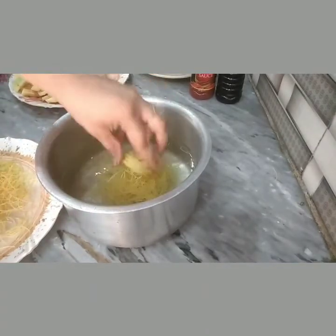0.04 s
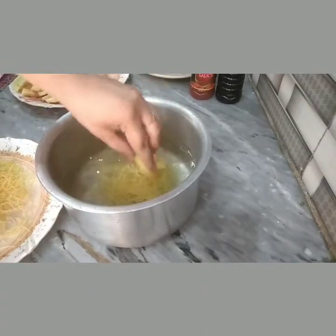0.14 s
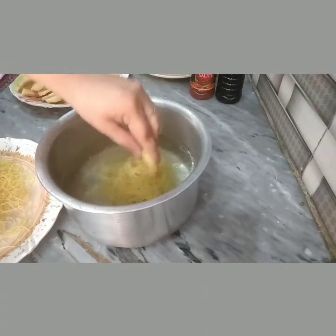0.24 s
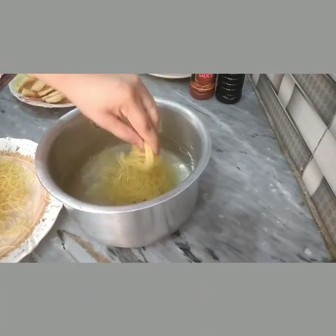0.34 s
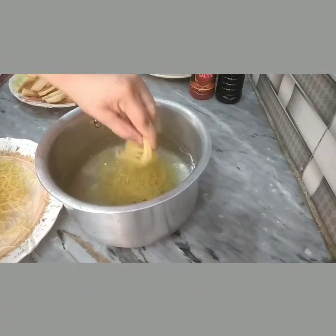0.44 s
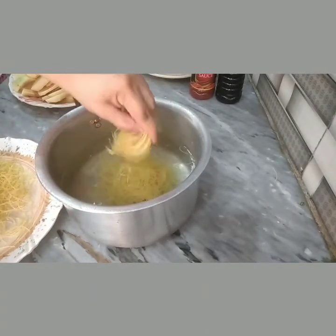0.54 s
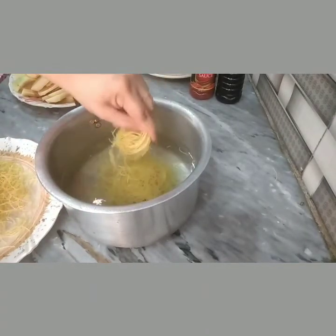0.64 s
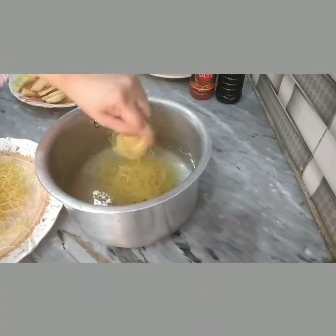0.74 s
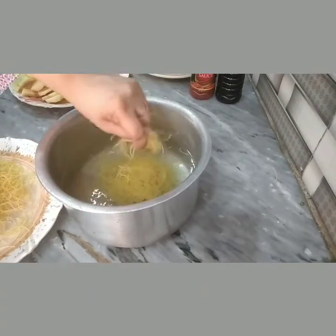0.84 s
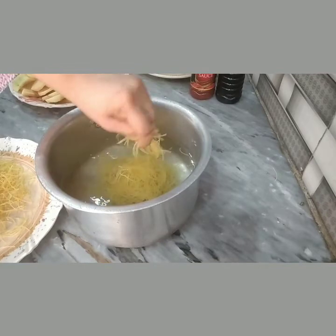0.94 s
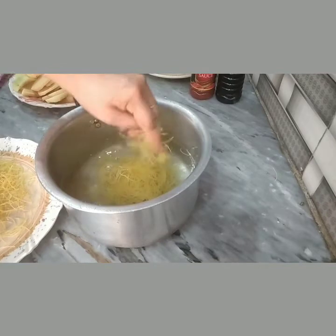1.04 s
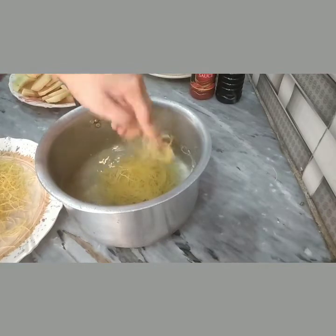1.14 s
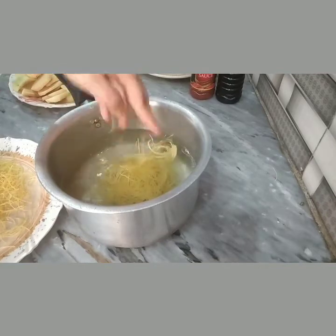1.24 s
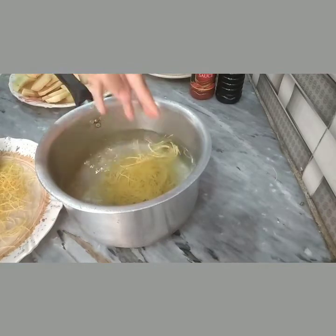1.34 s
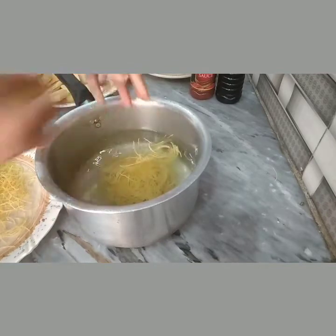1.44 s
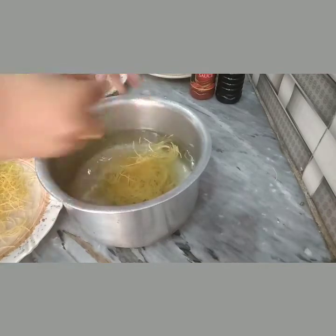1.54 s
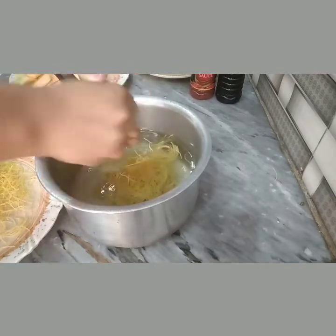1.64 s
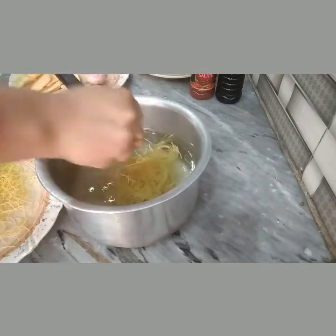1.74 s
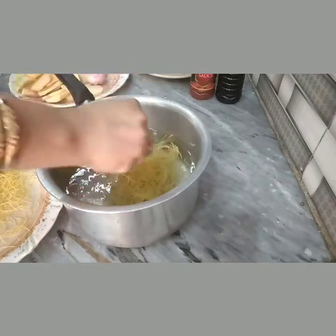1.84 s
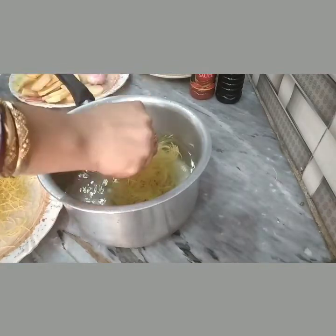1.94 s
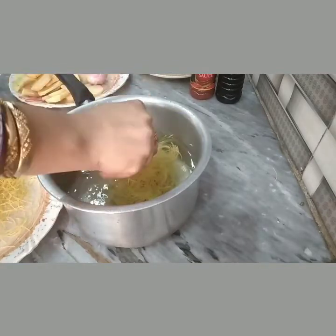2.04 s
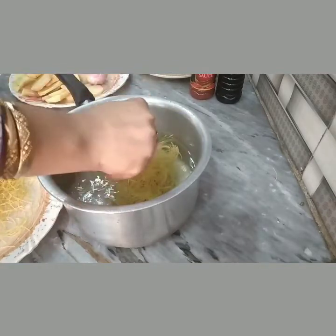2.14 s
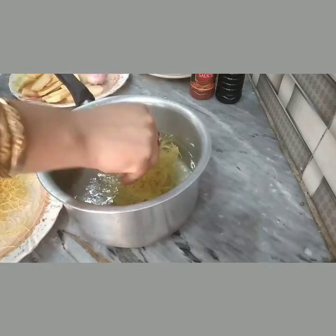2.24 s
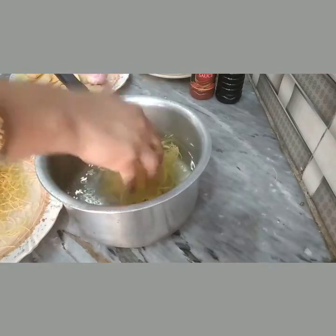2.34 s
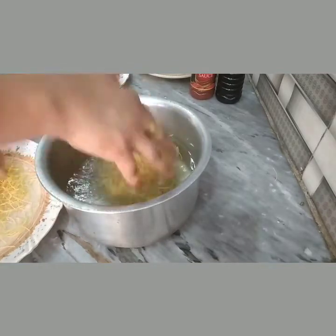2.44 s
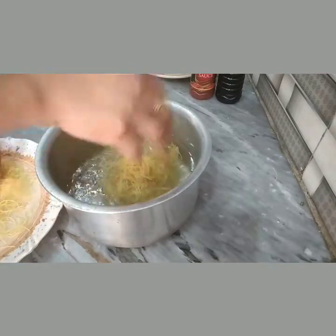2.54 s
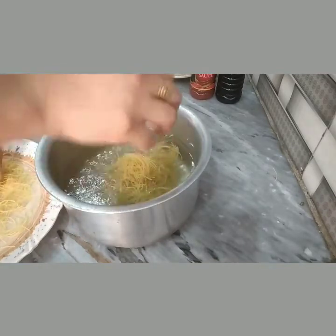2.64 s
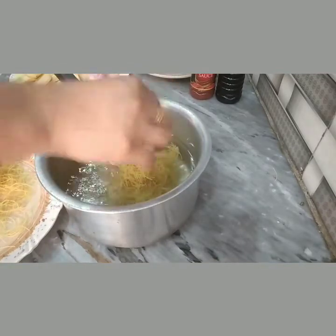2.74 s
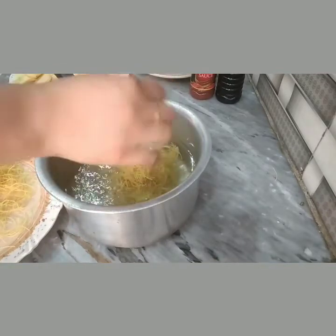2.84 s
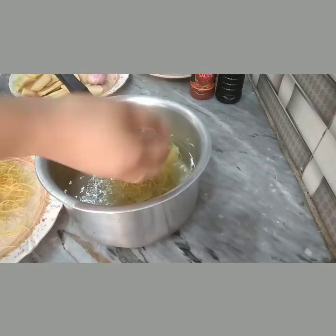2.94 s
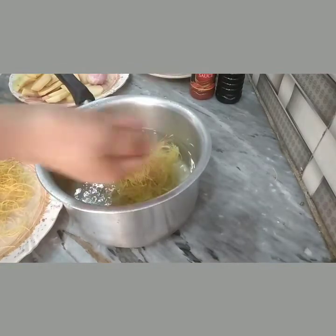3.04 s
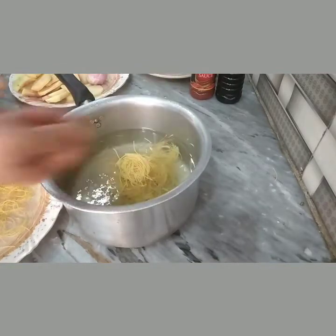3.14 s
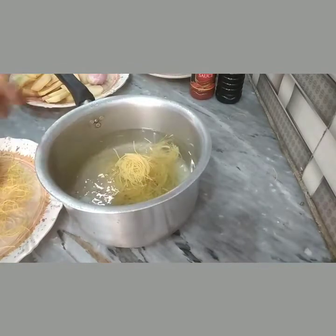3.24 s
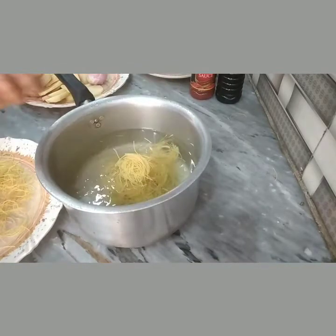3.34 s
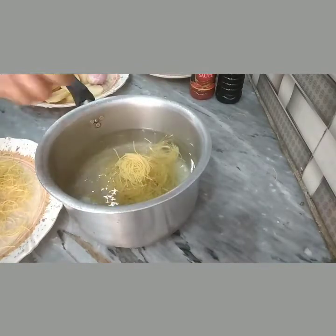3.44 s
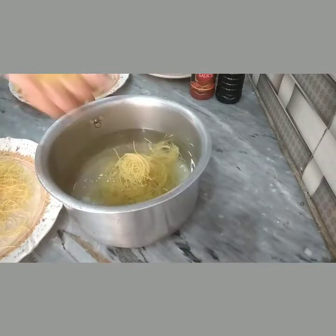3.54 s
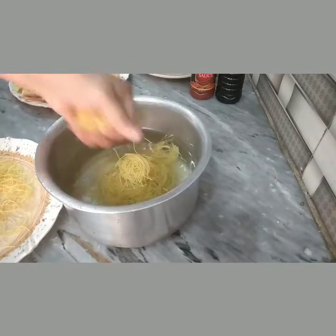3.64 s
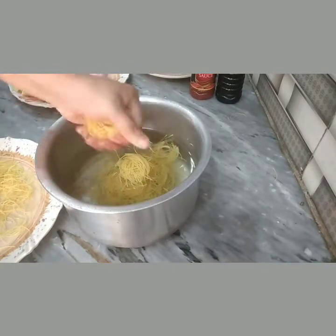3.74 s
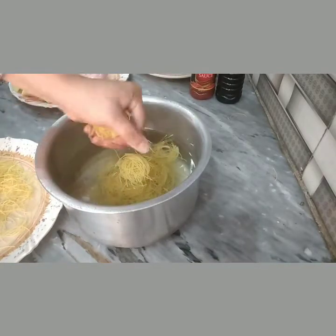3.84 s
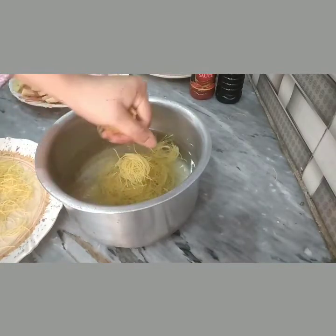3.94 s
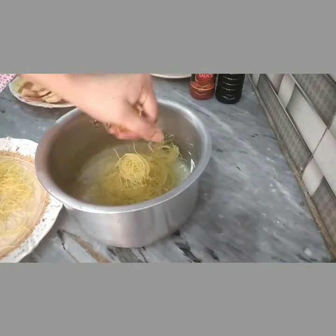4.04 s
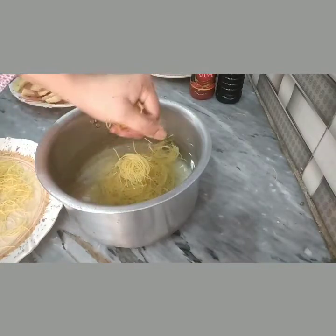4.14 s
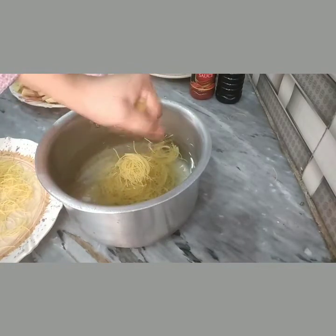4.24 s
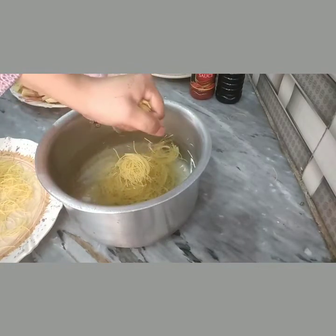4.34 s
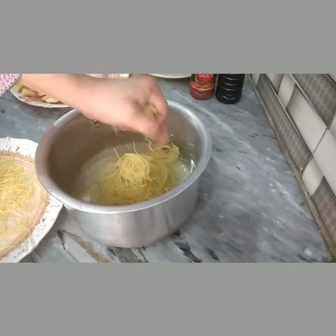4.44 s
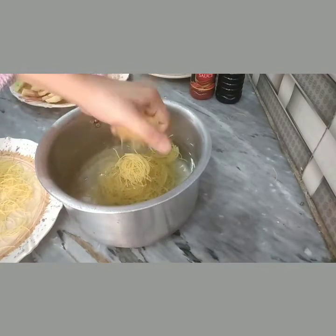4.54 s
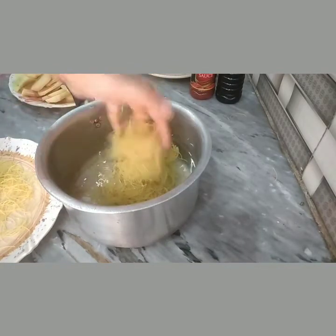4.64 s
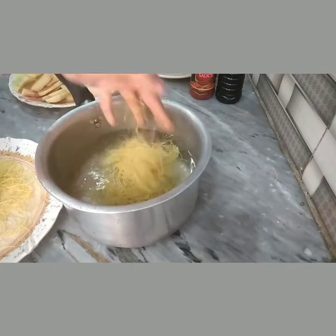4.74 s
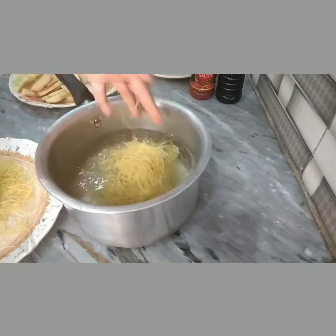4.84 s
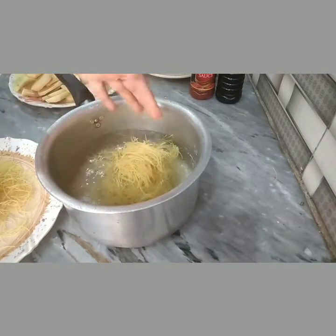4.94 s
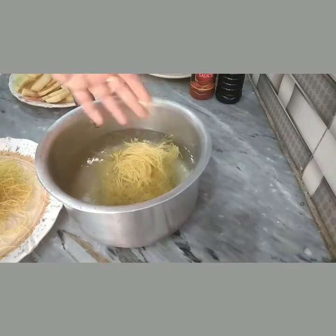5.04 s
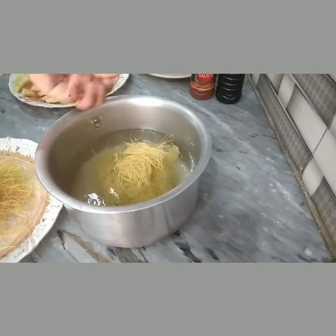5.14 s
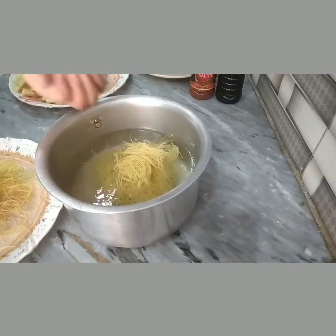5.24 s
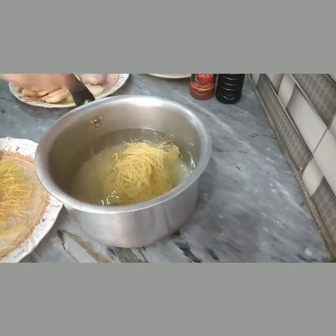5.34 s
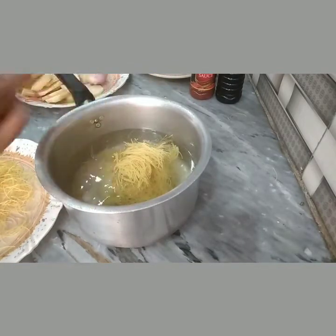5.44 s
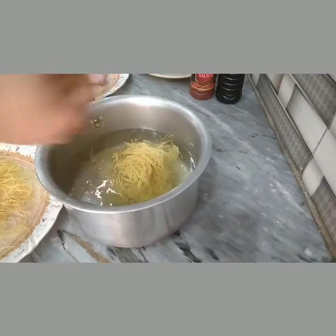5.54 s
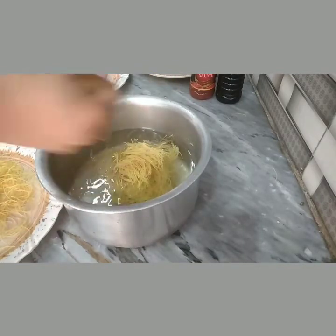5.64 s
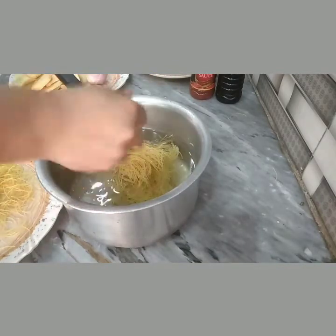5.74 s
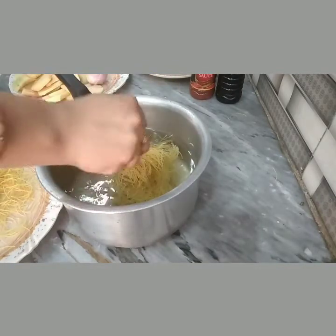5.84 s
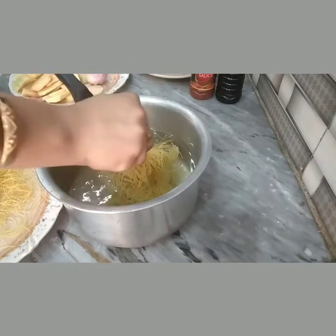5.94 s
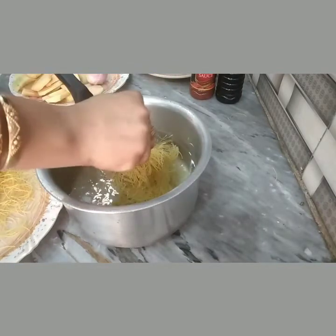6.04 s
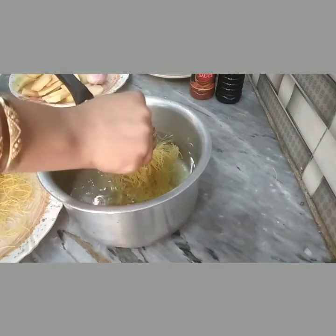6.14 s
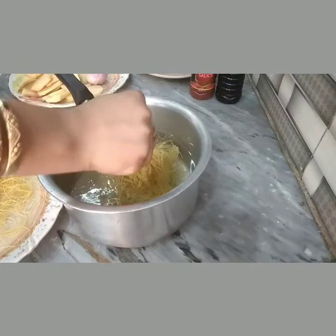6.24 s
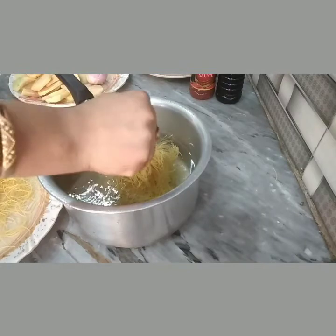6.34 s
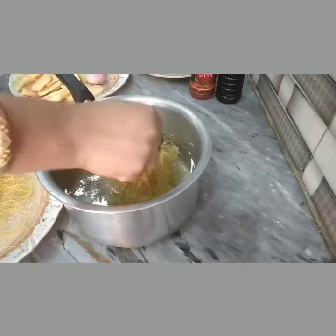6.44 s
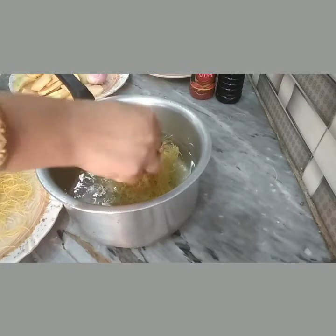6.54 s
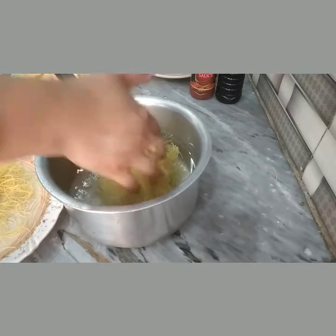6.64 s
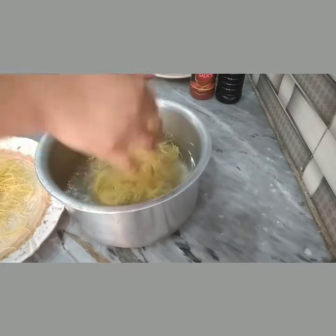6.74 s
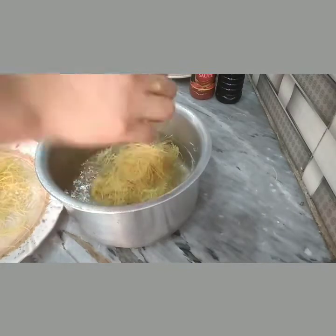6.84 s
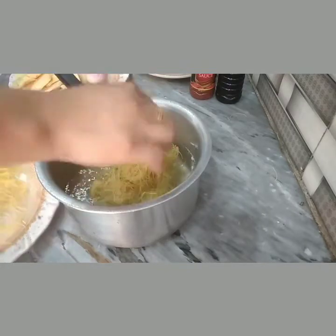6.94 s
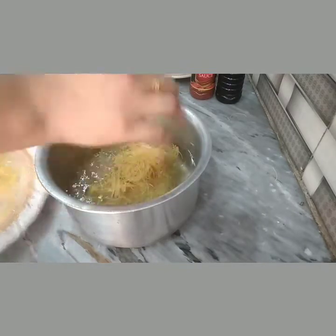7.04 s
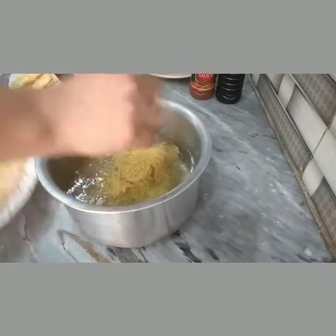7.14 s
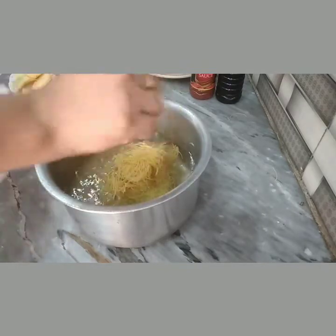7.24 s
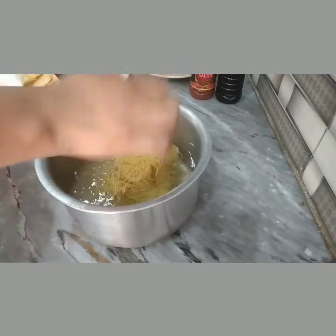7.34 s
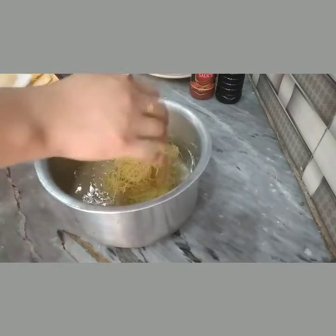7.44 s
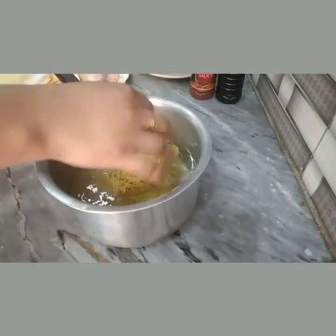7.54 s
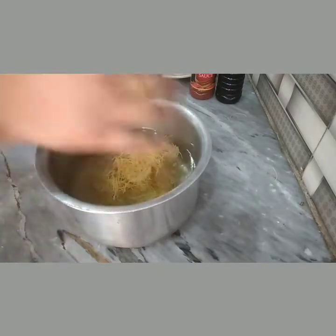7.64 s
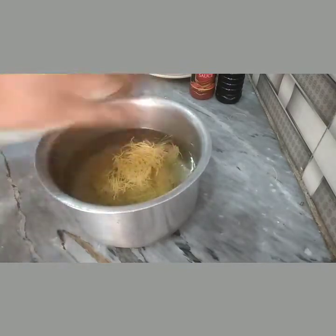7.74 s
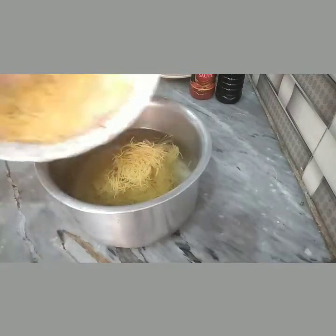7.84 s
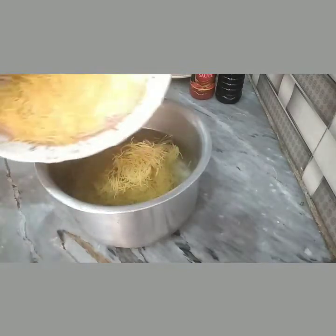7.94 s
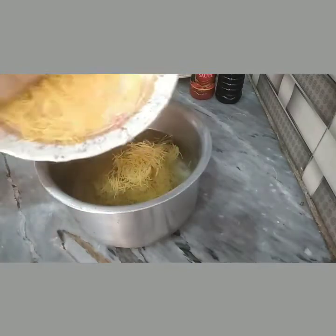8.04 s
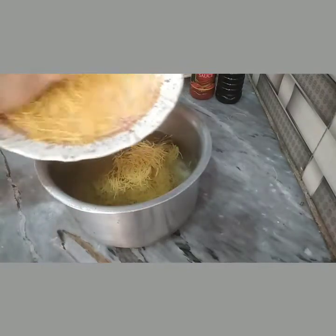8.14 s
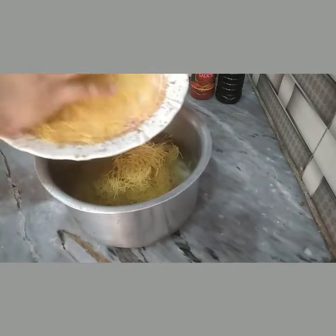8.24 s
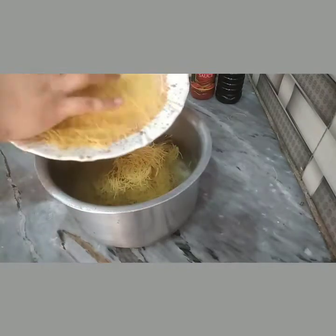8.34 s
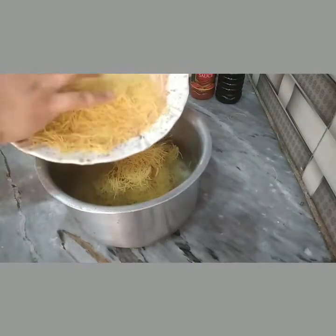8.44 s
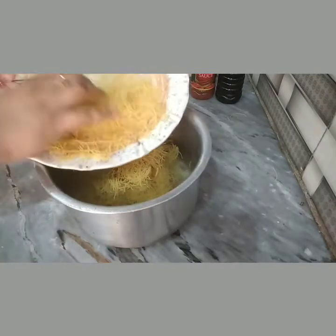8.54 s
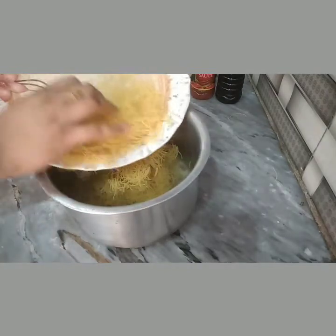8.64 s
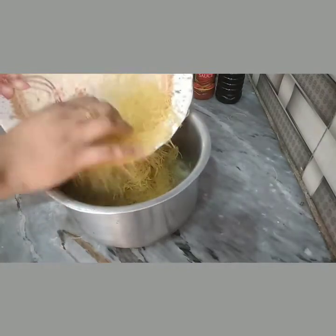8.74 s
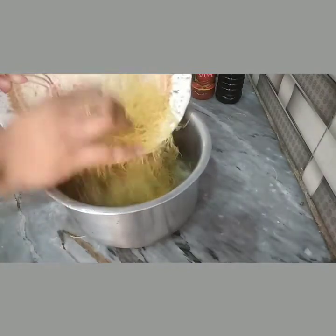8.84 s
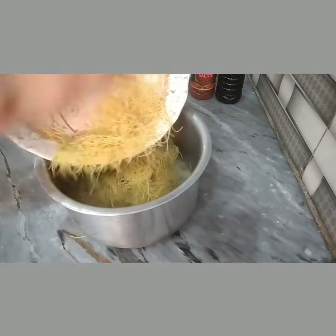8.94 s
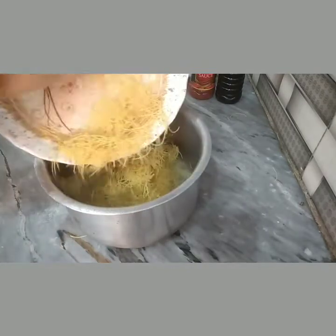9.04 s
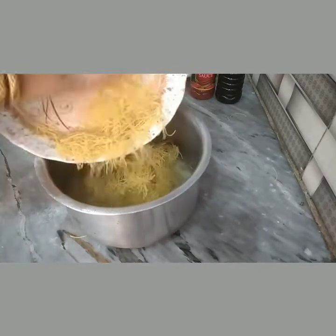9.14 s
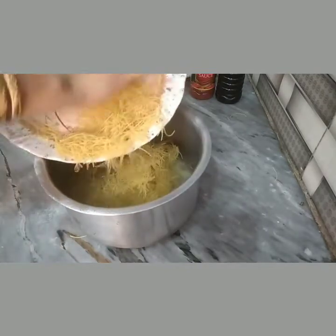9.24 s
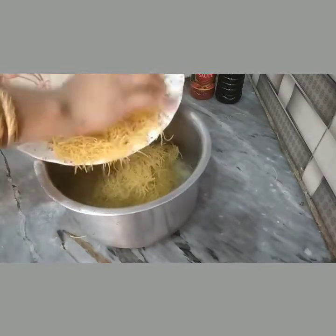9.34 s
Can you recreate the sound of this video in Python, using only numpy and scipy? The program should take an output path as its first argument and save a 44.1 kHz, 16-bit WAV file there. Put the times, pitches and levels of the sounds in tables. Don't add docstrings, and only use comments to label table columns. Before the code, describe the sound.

A small kitchen heard very close in stereo, with a short dull room tail and a faint low hum and rumble that swells into soft thumps whenever the counter is jolted. From 0 to 1.5 seconds it is almost quiet: tiny ticks, a brief pick at 0.8, a faint singing pot. From 1.6 to 2.3 a nest of thin dry pasta is crushed, dense bright crackle with hollow snaps peaking at 2.1, then a low bump. Loose strands sprinkle at 2.5 to 3.2. From 3.5 to 4.4 comes a longer, harder crush, strongest near 4.3, then shaken-off bits until 5.1. After a lull, a third crush runs from 5.7 to 6.4, with a deep crunch at 6.3, and light sprinkles around 7. From 8.1 strands scrape along a plate; it knocks the rim loudly at 8.6, clattering briefly, with smaller knocks and sliding until 9.2.

```python
import sys
import numpy as np
from scipy import signal
from scipy.fft import rfft, irfft
from scipy.io import wavfile
from scipy.ndimage import uniform_filter1d

SR = 44100
rng = np.random.default_rng(int(sys.argv[2]) if len(sys.argv) > 2 else 0)


def dump_mix(stems):
    frames = np.atleast_2d(stems).T
    limited = np.clip(frames, -1, 1)
    pcm = np.round(limited * 32767).astype(np.int16)
    wavfile.write(sys.argv[1], SR, pcm)


def field_ratio(decibels):
    return 10 ** (np.asarray(decibels, dtype=float) / 20)


N = 413658
STEP = 32

# (frequency [Hz], left minus right [dB])
PORT_DIFFERENCE = [(60, -3.5), (140, -0.5), (500, 0.5), (1170, 3), (2740, -1.5), (6410, 6.5), (9810, -6.5),
                   (15000, -13.5)]
# (frequency [Hz], likeness [0-1])
LIKENESS = [(60, .95), (150, .95), (380, .7), (950, .5), (2380, .55), (5980, .1), (15000, .15)]
# (frequency [Hz], level [dB])
SUPPRESS_BELOW = [(250, -85), (500, -65), (900, -54.5), (1500, -74), (2600, -80.5), (3600, -73),
                  (5000, -84.5), (8000, -98), (13000, -94), (16000, -87.5)]

STAND_HZ, STAND_WIDTH_HZ = 164.6, 24
STAND_RING_DB, STAND_RUMBLE_DB, AIR_DB = -55.5, -56, -56
ROCK_PER_S, ROCK_DB, ROCK_TOP_S = 30, 4.5, 4.6
NUDGE_S = 0.0035
# (frequency [Hz], level [dB per Hz])
RUMBLE_COLOUR = [(22, -23), (41, -7), (59, -14.5), (88, -5.5), (102, 0), (120, -9.5), (150, -3.5),
                 (290, -70.5)]
# (frequency [Hz], level [dB per Hz])
AIR_COLOUR = [(120, -37), (200, -9.5), (280, -21), (449, -11), (739, -9), (1230, -17.5), (2080, -23.5),
              (2580, -27.5), (5000, -95.5)]
# (middle [s], half length [s], ring level [dB], rumble level [dB])
JOLTS = [(.3, 0.41, -81, -54), (1.987, 0.28, -79.5, -50.5), (2.564, 0.09, -38.5, -46),
         (4.078, 0.054, -54, -43), (4.265, 0.07, -47, -42.5), (4.68, 0.1, -47.5, -48),
         (4.937, 0.072, -45, -48), (5.625, 0.07, -45.5, -48.5), (5.862, 0.12, -50, -47),
         (6.066, 0.061, -38, -30), (6.232, 0.05, -38, -35.5), (6.377, 0.086, -40, -57),
         (6.644, 0.12, -41.5, -67), (6.903, 0.094, -37.5, -67.5), (7.928, 0.02, -44.5, -69),
         (8.205, 0.053, -42.5, -65), (8.412, 0.07, -40, -53), (8.623, 0.046, -30, -55),
         (8.883, 0.093, -39, -69), (9.047, 0.039, -31.5, -66), (9.301, 0.25, -50.5, -54)]
# (time [s], height [full scale])
NUDGES = [
    (2.288, -.026),
    (2.32, 0.036),
]
ROOM_T60_S, ROOM_DB = 0.29, -5.5

# (frequency [Hz], level [dB], start [s], end [s])
POT_TONES = [
    (1466, -62, -0.54, 0.87),
    (1640, -63, -0.53, 0.53),
    (1120, -55, 0.16, 0.61),
    (1593, -59.5, 0.51, 0.814),
]

# (time [s], peak [dB], favoured frequency [Hz], crack against peak [dB])
KNOCKS = [(8.499, -19.5, 1080, -29), (8.512, -24.5, 1000, -23), (8.577, 4.5, 1190, -21.5),
          (8.627, -2, 2000, -21.5), (8.664, -20, 870, -18), (8.719, -26.5, 1000, -12),
          (8.826, -25, 934, -13.5), (8.872, -23, 533, -10.5), (8.905, -20, 540, -22),
          (9.118, -24, 1140, -22), (9.14, -30, 540, -19)]
# (frequency [Hz], level [dB], 60 dB decay time [s])
PLATE_MODES = [(163, -21, 0.12), (374, -33, 0.263), (540, -4, 0.21), (651, -10, 0.13), (891, -1.5, 0.061),
               (953.4, -2, 0.15), (1230, -4, 0.06), (1546, -1.5, 0.065), (1737, -12.5, 0.083),
               (2136, -6.5, 0.0696), (2580, -12, 0.042), (3190, -13, 0.07)]
# (time [s], level [dB])
SWEEP = [(7.9, -53), (8.218, -39.5), (8.492, -42.5), (8.56, -34.5), (8.784, -36), (8.912, -28),
         (9.108, -42.5), (9.3, -52)]
RATTLE_DB, RATTLE_T60_S = -19, 0.16

# (frequency [Hz], level [dB per Hz])
BRIGHT_COLOUR = [(1760, -35), (3000, -3), (3750, -5.5), (5600, -3.5), (7460, 2.5), (8700, -4), (11000, -1),
                 (15100, -17.5), (16000, -3.5)]
# (frequency [Hz], level [dB per Hz])
HOLLOW_COLOUR = [(1200, -29), (1500, -5), (1800, -3), (2080, 0.5), (2250, 0.5), (2450, -4.5), (2680, -3),
                 (2850, -16), (3600, -48.5)]
# (frequency [Hz], level [dB per Hz])
BODY_COLOUR = [(640, -28), (860, -2.5), (1050, 0), (1250, 1.5), (1500, 1.5), (1800, -16)]
# (frequency [Hz], level [dB per Hz])
CRUNCH_COLOUR = [(200, -24.5), (300, -5.5), (450, -2), (700, 3), (900, -29.5)]

# (time [s], crackle level [dB], cupping of the hand [dB])
SQUEEZES = [
    [(1.56, -53.5, 3), (1.62, -37.5, -2.5), (1.72, -33, 4.5), (2.01, -32, 3.5), (2.09, -28, 5),
     (2.24, -42.5, 10.5), (2.33, -59, 9.5)],
    [(3.495, -40.5, 7), (3.61, -36.5, 2.5), (3.68, -47.5, -1), (3.78, -36, 4.5), (3.9, -35, 9),
     (3.96, -39.5, -1.5), (3.985, -59, -5.5)],
    [(3.995, -42.5, -3), (4.05, -35, 0.5), (4.125, -39.5, 0.5), (4.16, -27, 3), (4.2, -31.5, 2),
     (4.31, -25, 10), (4.44, -53.5, 2.5)],
    [(5.635, -55, 1), (5.72, -42.5, 2), (5.9, -32.5, -1), (5.95, -41, 3), (6.13, -33, 1.5),
     (6.21, -39.5, -5.5), (6.3, -30.5, 8.5), (6.4, -45, 10.5), (6.56, -62, -3)],
    [(7.9, -67, -4), (8.1, -40, -0.5), (8.31, -39, 4), (8.46, -44.5, -4), (8.78, -39, 1), (9.14, -45.5, -7),
     (9.3, -67.5, 7.5)],
]
# (hollow [dB], body [dB], low crunch [dB], top treble [dB])
SQUEEZE_VOICES = [
    (-1.5, -4, -25.5, 3.5),
    (-1, -9.5, -27.5, 4.5),
    (2, -10, -26, 3.5),
    (0, -5, -22.5, 4),
    (2.5, 1, -29, -7),
]
# (start [s], length [s], crackle level [dB], fade [dB per s], cupping [dB])
PICKS = [(0, 0.045, -75.5, -37, 22), (.303, 0.054, -64, 70, 2.5), (.44, 0.1, -64.5, -36.5, -3.5),
         (.553, 0.089, -39, 161, -7.5), (.764, 0.078, -38.5, 44.5, 5), (.87, 0.094, -52.5, 25.5, -4),
         (1.19, 0.096, -68, -10, 1.5), (1.48, 0.048, -63, 8, 1.5), (2.34, 0.16, -60, -42.5, -4.5),
         (3.36, .12, -50, 79, 4), (6.635, 0.14, -56, 2.5, 1.5)]
# (start [s], length [s], crackle level [dB], fade [dB per s], cupping [dB])
SPRINKLES = [
    (2.51, 0.41, -35, 45.5, 3.5),
    (2.9, 0.17, -48, 64, -2.5),
    (3.02, 0.13, -42.5, 59, 3.5),
    (3.14, 0.069, -46.5, 19, -5.5),
    (6.88, 0.17, -51.5, 53, 5),
    (7.095, 0.025, -55, -13, -10),
    (7.303, 0.075, -50.5, 63, -16),
]
# (start [s], length [s], crackle level [dB], fade [dB per s], cupping [dB])
SHAKES = [
    (4.47, 0.13, -43.5, -12, 5),
    (4.59, 0.11, -39.5, 8, 7),
    (4.71, 0.28, -42.5, 15.5, -0.5),
    (4.93, 0.21, -42, 80, 7.5),
]
PICK_VOICE, SPRINKLE_VOICE = (1, -8, -28, 7), (1, -7.5, -20, -15.5)
SHAKE_VOICE = (-0.5, -8, -23.5, -8.5)
ATTACK_S, RELEASE_DB_PER_S = 0.012, 691
SHEEN_SLOPE = 0.2
CUP_SHARES = (0.97, 0.99, 0.63)
# (time [s], extra level [dB], rise [s], fall [s])
COLLAPSES = [
    (2.096, 6, 0.0063, 0.017),
    (.803, 7, 0.017, 0.011),
    (4.301, 0.5, 0.0026, 0.049),
    (6.282, 14.5, 0.019, 0.013),
]
# (hollow [dB], body [dB], crunch [dB])
COLLAPSE_DEPTH_DB = (0.5, 3.5, 17.5)

# (time [s], hollow peak [dB], hollow frequency [Hz], body peak [dB])
FIRST_SNAPS = [(1.6091, -30, 1700, -38), (1.6242, -31.5, 2610, -42), (1.6364, -32.5, 2670, -41),
               (1.646, -30.5, 1980, -42), (1.6679, -28, 1735, -21.5), (1.6911, -22.5, 2670, -40),
               (1.7057, -21, 2630, -33), (1.7226, -27.5, 1745, -22.5), (1.7309, -26.5, 2663, -25.5),
               (1.7708, -32, 1690, -35.5), (1.812, -26, 2167, -33), (1.8321, -21, 2270, -19),
               (1.8441, -29, 2186, -22), (1.8559, -30.5, 1518, -28), (1.8701, -25.5, 2270, -27),
               (1.8848, -30.5, 2223, -33.5), (1.8933, -28, 2730, -30.5), (1.9069, -30, 1640, -30),
               (1.9201, -18.5, 2700, -31), (1.93, -28, 2288, -23), (1.9421, -25, 1510, -30.5),
               (1.9695, -32.5, 2220, -24.5), (1.982, -26.5, 2780, -31), (2.0032, -31.5, 2690, -29),
               (2.011, -28.5, 2280, -22.5), (2.033, -22, 2710, -25), (2.0425, -18.5, 2773, -25.5),
               (2.0708, -18.5, 2243, -23.5), (2.0798, -11.5, 2814, -18.5), (2.0942, -14, 2240, -15.5),
               (2.104, -11.5, 2238, -9), (2.1185, -21, 1507, -20.5), (2.14, -28.5, 2233, -25),
               (2.1698, -35, 1505, -24.5), (2.2049, -26, 2206, -25.5)]
SECOND_SNAPS = [(3.4974, -27.5, 2290, -28), (3.5079, -33, 2170, -36), (3.5175, -21.5, 2240, -21.5),
                (3.5309, -19.5, 2300, -22.5), (3.5488, -19.5, 2300, -35), (3.5626, -22.5, 2410, -30),
                (3.5718, -17.5, 2190, -40), (3.5852, -21.5, 2300, -21), (3.5922, -16, 2230, -48),
                (3.6003, -24.5, 2270, -49), (3.6155, -22.5, 1690, -50.5), (3.6398, -19.5, 2260, -40),
                (3.6542, -33.5, 2270, -34), (3.6924, -15.5, 2300, -41.5), (3.7046, -17, 2000, -45),
                (3.7246, -13, 2610, -40), (3.7794, -26.5, 2230, -29), (3.7858, -26.5, 2240, -54),
                (3.7942, -19, 2580, -43), (3.8118, -22.5, 2570, -55), (3.8333, -25, 2280, -28.5),
                (3.8478, -14.5, 2090, -32), (3.8598, -23, 1840, -36.5), (3.8798, -16, 2624, -31),
                (3.8943, -16, 2070, -30), (3.9086, -21, 2247, -37), (3.9396, -23.5, 2526, -41),
                (3.9456, -28, 2573, -45), (3.9955, -31.5, 2594, -51), (4.0146, -25, 2644, -38.5),
                (4.0411, -24.5, 2287, -36.5), (4.0495, -24.5, 1986, -38), (4.0641, -28.5, 2070, -46),
                (4.0921, -25.5, 2040, -38), (4.1115, -28, 2550, -44), (4.1346, -22, 2070, -31),
                (4.1506, -19, 2143, -29.5), (4.1672, -17, 2055, -32), (4.1769, -22.5, 2038, -31.5),
                (4.186, -20, 2220, -32.5), (4.2229, -21, 2030, -32.5), (4.2368, -16.5, 2110, -29.5),
                (4.2518, -13.5, 2060, -30), (4.2961, -12, 1750, -18.5), (4.3033, -9, 2010, -21.5),
                (4.315, -8, 1810, -23), (4.3224, -14, 1900, -21.5), (4.347, -17.5, 2030, -22),
                (4.3672, -21.5, 2020, -41)]
THIRD_SNAPS = [(5.7018, -28, 2340, -46), (5.7385, -19.5, 1790, -52), (5.749, -24.5, 1760, -38),
               (5.7786, -29, 1750, -35), (5.8084, -24.5, 2060, -40), (5.8208, -25, 2200, -27),
               (5.8462, -16, 2000, -25.5), (5.8608, -32, 2320, -38), (5.8728, -31, 2200, -31.5),
               (5.8871, -26.5, 2260, -36.5), (5.8934, -20, 2210, -39), (5.9184, -24, 2280, -28.5),
               (5.9365, -30.5, 2246, -34), (5.962, -17.5, 2200, -31.5), (5.993, -27.5, 2260, -21.5),
               (5.9995, -29.5, 2300, -36.5), (6.0443, -30.5, 2200, -40.5), (6.059, -29, 2270, -39.5),
               (6.0706, -33, 2200, -32.5), (6.0916, -29, 2223, -33), (6.1125, -16.5, 2160, -22),
               (6.1679, -30.5, 2300, -31), (6.182, -33.5, 2760, -42), (6.215, -32, 2250, -37),
               (6.2425, -24.5, 2250, -30.5), (6.2619, -23.5, 2260, -22), (6.2809, -16.5, 2210, -10),
               (6.2881, -9.5, 1940, -14), (6.3005, -13, 1953, -19), (6.3232, -18, 1845, -32),
               (6.3334, -17.5, 1860, -41), (6.3438, -17.5, 1870, -16), (6.3589, -25, 2150, -31)]
PLATE_SNAPS = [(8.1059, -31.5, 1560, -37), (8.1125, -28, 1510, -45), (8.1334, -27.5, 2250, -43),
               (8.2206, -33, 1710, -32), (8.2556, -35.5, 1610, -32.5), (8.2631, -37, 1670, -35.5),
               (8.2847, -34.5, 1510, -35), (8.2955, -39.5, 2220, -33), (8.3047, -33.5, 1810, -44),
               (8.3402, -37.5, 1510, -33)]
STRAY_SNAPS = [(0.566, -36, 1770, -33), (0.789, -22.5, 1520, -31.5), (0.8, -32, 2080, -23),
               (0.809, -30.5, 1760, -23.5), (0.83, -34.5, 2330, -40), (1.191, -43.5, 2000, -58),
               (2.903, -32.5, 1900, -37), (3.045, -34.5, 1930, -40), (4.63, -37.5, 2100, -47),
               (5.07, -33, 2080, -42)]
SPRAY_DB, SPRAY_SLOPE = (-3.5, -10, -9.5, -13.5, -13), -.3
# (time [s], peak [dB])
TICKS = [(0.486, -33.5), (0.504, -36.5), (0.556, -32), (0.763, -28), (0.8283, -15.5), (1.491, -36),
         (1.538, -20), (1.5884, -22.5), (2.904, -29.5), (3.022, -27), (3.1924, -37), (3.375, -24.5),
         (3.768, -19), (3.996, -13.5), (4.0119, -29), (4.9317, -40), (5.654, -31), (5.6757, -23.5),
         (5.425, -51), (6.2302, -20.5), (8.502, -20.5), (8.514, -25.5)]
TICK_DB = -9.5
# (start [s], end [s], frequency [Hz], boost [dB])
CAVITIES = [(1.68, 2.3, 2200, 2), (1.8, 2.3, 2700, 5), (2.1, 2.3, 1030, 0.5), (2, 1.7, 1500, 3),
            (3.49, 4.2, 2280, 0.5), (3.7, 4.33, 2625, 7.5), (3.76, 4.46, 2030, 3.5), (4.1, 3.97, 2200, 5),
            (3.84, 4.46, 770, 7), (5.7, 6.3, 2260, 2.5), (6.26, 6.45, 1880, 2), (5.4, 6.27, 2750, 6.5),
            (5.9, 6.45, 985, 3), (8.05, 8.3, 3150, 11), (9, 8.45, 2400, 0.5), (4.26, 4.38, 1760, 4),
            (3.49, 3.78, 474, 11), (5.68, 6.1, 310, 8)]
CAVITY_WIDTH_HZ = 61


def unit_rms(x):
    return x / np.sqrt(np.mean(x ** 2) + 1e-20)


def per_sample(slow):
    return [np.interp(np.arange(N) / STEP, np.arange(len(c)), c) for c in slow]


def at_hz(points, size=8192):
    hz = np.maximum(np.arange(size // 2 + 1) * SR / size, 1)
    table = np.array(points)
    return np.interp(np.log(hz), np.log(table[:, 0]), table[:, 1])


def causal(gain):
    fold = irfft(np.log(gain + 1e-6))
    fold[1:len(gain) - 1] *= 2
    fold[len(gain):] = 0
    return irfft(np.exp(rfft(fold)))


def colour(common, own, spectrum):
    alike = np.clip(at_hz(LIKENESS), 0, .98)
    gain = field_ratio(at_hz(spectrum))
    gain = gain / np.sqrt(np.mean(gain ** 2))
    out = []
    for side, sign in enumerate((1, -1)):
        port = gain * field_ratio(sign * at_hz(PORT_DIFFERENCE) / 2)
        shared = signal.oaconvolve(common[side], causal(port * np.sqrt(alike)))
        private = signal.oaconvolve(own[side], causal(port * np.sqrt(1 - alike)))
        out.append(shared[:N] + private[:N])
    return np.array(out)


def splinter(strength, t60):
    burst = signal.lfilter([1], [1, -field_ratio(-60 / (t60 * SR))], strength + 1e-18)
    size = burst.shape[-1]
    return burst * rng.standard_normal(size), burst * rng.standard_normal((2, size))


def ring(clicks, hz, t60):
    r, w = field_ratio(-60 / (t60 * SR)), 2 * np.pi * hz / SR
    return signal.lfilter([0, np.sin(w)], [1, -2 * r * np.cos(w), r * r], clicks + 1e-18)


def kitchen(x):
    t = np.arange(int(.4 * SR)) / SR
    tail = rng.standard_normal((2, len(t))) * field_ratio(-60 * t / ROOM_T60_S) * (t > .003)
    tail = signal.lfilter([1], [1, -.5], tail)
    response = unit_rms(tail) / np.sqrt(len(t))
    return field_ratio(ROOM_DB) * signal.fftconvolve(x, response, axes=1)[:, :N]


def jolts():
    t = np.arange(0, N, STEP) / SR
    rocking = np.exp(-((t - 6.75) / .4) ** 2)
    throb = field_ratio(ROCK_DB * rocking * np.cos(2 * np.pi * ROCK_PER_S * (t - ROCK_TOP_S))) ** 2
    power = field_ratio(np.array([[STAND_RING_DB], [STAND_RUMBLE_DB]])) ** 2
    for s, half, *db in JOLTS:
        swell = np.exp(-((t - s) / half) ** 4)
        power = power + throb * field_ratio(np.array(db))[:, None] ** 2 * swell
    return per_sample(10 * np.log10(power))


def stand():
    ring_db, rumble_db = jolts()
    shake = rng.standard_normal(N) + 0.3 * rng.standard_normal((2, N))
    hum = ring(ring(shake, STAND_HZ, 2.2 / STAND_WIDTH_HZ), STAND_HZ, .021)
    steady = np.sin(2 * np.pi * STAND_HZ * np.arange(N) / SR)
    hum = unit_rms(unit_rms(hum) + 2.4 * steady)
    thud = unit_rms(ring(ring(shake, 250, 0.051), 250, 0.051))
    white = rng.standard_normal((3, N))
    rumble = unit_rms(colour(white[[0, 0]], white[1:], RUMBLE_COLOUR))
    air = unit_rms(colour(white[[1, 1]], white[::2], AIR_COLOUR))
    return field_ratio(ring_db) * (hum + field_ratio(-17.0) * thud) + field_ratio(rumble_db) * rumble + field_ratio(AIR_DB) * air


def nudges():
    t = np.arange(N) / SR
    return sum(height * np.exp(-((t - s) / NUDGE_S) ** 2) for s, height in NUDGES)


def pot():
    t, out = np.arange(SR) / SR, np.zeros((2, N))
    for hz, level_db, start, end in POT_TONES:
        swell = np.sin(np.pi * np.clip((t - start) / (end - start), 0, 1))
        wavering = unit_rms(ring(rng.standard_normal((2, SR)), hz, .09))
        steady = 1.1 * np.sin(2 * np.pi * hz * t)
        out[:, :SR] += field_ratio(level_db) * swell * (wavering + steady) / 2
    return out


def plate():
    s, peak_db, favoured_hz, crack_db = np.transpose(KNOCKS)
    at = (s * SR).astype(int)
    start_s, end_s = SWEEP[0][0], SWEEP[-1][0]
    t = np.arange(N) / SR
    inside = (np.arange(N) > start_s * SR) * (np.arange(N) < end_s * SR)
    slide = field_ratio(np.interp(t, *np.transpose(SWEEP)) - 33.5) * inside
    chatter = np.zeros(N)
    chatter[at] = field_ratio(np.minimum(peak_db, -2) + RATTLE_DB - 42.0)
    slide = slide + signal.lfilter([1], [1, -field_ratio(-60 / (RATTLE_T60_S * SR))], chatter + 1e-18)

    first = int(start_s * SR)
    size = N - first
    patch_at = np.arange(0, size, 900)
    modes = np.zeros((2, N))
    for k, (hz, level_db, t60) in enumerate(PLATE_MODES):
        clicks = np.zeros(size)
        clicks[at - first] = field_ratio(peak_db - 25 - 4.5 * np.log2(hz / favoured_hz) ** 2)
        patches_db = np.interp(np.arange(size), patch_at, 4 * rng.standard_normal(len(patch_at)))
        common, own = splinter(clicks, 0.0096)
        grains = slide[first:] * field_ratio(-6.0 * np.log2(hz / 1100) ** 2)
        grains = grains * rng.standard_normal(size) * field_ratio(patches_db)
        push = 5.1 * (-1) ** k * clicks + common + 1.09 * own + grains
        modes[:, first:] += field_ratio(level_db) * ring(push, hz, 0.48 * t60)

    crack = np.zeros((2, N))
    crack[:, at] = field_ratio(peak_db + crack_db - 1.5)
    common, own = splinter(crack, 0.11)
    dull = signal.butter(2, 10500, fs=SR, output="sos")
    bright = signal.sosfilt(dull, colour(common, own, BRIGHT_COLOUR))
    hollow = field_ratio(-4.5) * colour(common, own, HOLLOW_COLOUR)
    return modes * field_ratio([[-1.2], [1.2]]) + bright + hollow


def actions(t):
    for rows, voice in zip(SQUEEZES, SQUEEZE_VOICES):
        s, level_db, cup_db = np.transpose(rows)
        outside = np.maximum(s[0] - t, 0) * 10 + np.maximum(t - s[-1], 0)
        level = field_ratio(np.interp(t, s, level_db) - RELEASE_DB_PER_S * outside)
        yield level, np.interp(t, s, cup_db), voice
    kinds = ((PICKS, PICK_VOICE, 0), (SPRINKLES, SPRINKLE_VOICE, SHEEN_SLOPE), (SHAKES, SHAKE_VOICE, 0))
    for table, voice, slope in kinds:
        for start, length, db, fade, cup_db in table:
            age = t - start
            fallen_db = fade * np.clip(age, 0, length) + RELEASE_DB_PER_S * np.maximum(age - length, 0)
            level = np.clip(age / ATTACK_S, 0, 1) * field_ratio(db - fallen_db)
            yield level, cup_db, (*voice[:3], voice[3] + slope * (db + 47.0))


def bump(t, middle, rise, fall):
    return np.exp(-np.where(t < middle, (middle - t) / rise, (t - middle) / fall) ** 2)


def collapse_db(t):
    swell = sum(db * bump(t, s, rise, fall) for s, db, rise, fall in COLLAPSES)
    depth = sum(bump(t, s, 0.0079, 0.018) for s, *_ in COLLAPSES)
    return swell, depth


def shower_db():
    t = np.arange(0, N, STEP) / SR
    power = np.full((5, len(t)), 1e-13)
    for level, cup_db, voice in actions(t):
        power[0] += level ** 2
        for k, share in enumerate((*CUP_SHARES, 0)):
            power[k + 1] += (level * field_ratio(voice[k] + share * cup_db)) ** 2
    bright, hollow, body, crunch, top = 10 * np.log10(power)
    swell_db, depth = collapse_db(t)
    layers = zip((hollow, body, crunch), COLLAPSE_DEPTH_DB)
    deep = [db + swell_db + depth * extra for db, extra in layers]
    return per_sample([bright + swell_db + 1.5] + deep + [top - bright])


def crackle():
    bright_db, hollow_db, body_db, crunch_db, sheen_db = shower_db()
    clumps = unit_rms(signal.lfilter([1], [1, -.998], rng.standard_normal(N)))
    breaks = rng.random(N) < 900 * field_ratio(clumps) / SR
    born = breaks * field_ratio(2.6 * np.minimum(rng.exponential(1, N), 3.5))
    # (colour, level [dB], decay [s], spread of strengths [dB])
    layers = ((BRIGHT_COLOUR, bright_db - 0.55, .012, 1.5), (HOLLOW_COLOUR, hollow_db - 9.5, .007, 4.2),
              (BODY_COLOUR, body_db - 4.5, .008, 3.2), (CRUNCH_COLOUR, crunch_db - .6, .009, 3.1))
    out = 0
    for spectrum, level_db, t60, spread_db in layers:
        strength = born * field_ratio(spread_db * rng.standard_normal(N)) + 0.027
        common, own = splinter(strength * np.ones((2, 1)), t60)
        scale = field_ratio(level_db) / np.sqrt(np.mean(own ** 2))
        out = out + colour(common * scale, own * scale, spectrum)
    top = signal.sosfiltfilt(signal.butter(2, 9000, "high", fs=SR, output="sos"), out)
    shoulder = signal.sosfiltfilt(signal.butter(2, [2900, 5000], "band", fs=SR, output="sos"), out)
    open_db = np.clip(hollow_db - bright_db, -30, 0)
    return out + (field_ratio(sheen_db) - 1) * top + (field_ratio(open_db) - 1) * shoulder


def snaps():
    rows = []
    for table, spray_db in zip((FIRST_SNAPS, SECOND_SNAPS, THIRD_SNAPS, PLATE_SNAPS, STRAY_SNAPS), SPRAY_DB):
        for s, db, hz, low_db in table:
            rows.append((s, db, spray_db + SPRAY_SLOPE * (db + 20.5), hz, low_db))
    s, peak_db, bright_db, hollow_hz, body_db = np.transpose(rows)
    hollow, spray, t = np.zeros((2, N)), np.zeros((2, N)), np.arange(600) / SR
    for k, chance in enumerate(rng.uniform(-0.89, 1, (len(s), 4))):
        hz, body_hz = hollow_hz[k], 1250 * (1 + .2 * chance[2])
        click = field_ratio(peak_db[k] + 1) * np.sin(2 * np.pi * hz * t) * field_ratio(-60 * t * hz / 18)
        click = click + field_ratio(body_db[k] + 6) * np.sin(2 * np.pi * body_hz * t) * field_ratio(-60 * t * body_hz / 6)
        click = click + 0.46 * np.roll(click, int((0.002347 + .001 * chance[0]) * SR))
        lag = int(1.5 + 6.4 * chance[1])
        for side, at in enumerate(int(s[k] * SR) + np.array([lag, 0])):
            hollow[side, at:at + len(t)] += click * field_ratio(0.69 * chance[3] * (-1) ** side)
    spray[:, (s * SR).astype(int)] = field_ratio(peak_db + bright_db - 1.5)
    tick_s, tick_db = np.transpose(TICKS)
    spray[:, (tick_s * SR).astype(int)] = field_ratio(tick_db + TICK_DB)
    hollow = signal.sosfilt(signal.butter(4, [720, 3000], "band", fs=SR, output="sos"), hollow)
    crumbs = colour(*splinter(spray * field_ratio(-10.5), 0.033), BRIGHT_COLOUR)
    common, own = splinter(spray, 0.021)
    edge = colour(common + 2.3 * spray, own, BRIGHT_COLOUR)
    thin = signal.butter(2, 3800, "high", fs=SR, output="sos")
    return hollow + signal.sosfilt(thin, edge + crumbs)


def cavities(x):
    out, r = x.copy(), np.exp(-np.pi * CAVITY_WIDTH_HZ / SR)
    for start, end, hz, boost_db in CAVITIES:
        span = slice(int(start * SR), int(end * SR))
        fade = np.minimum(2 * np.sqrt(np.hanning(span.stop - span.start)), 1)
        rung = signal.lfilter([1, 0, -1], [1, -2 * r * np.cos(2 * np.pi * hz / SR), r * r], x[:, span])
        out[:, span] += field_ratio(boost_db) * (1 - r * r) / 2 * fade * rung
    return out


def scene():
    knocks = signal.sosfilt(signal.butter(2, 130, "high", fs=SR, output="sos"), plate())
    pasta = cavities(crackle() + snaps())
    room = kitchen(knocks + 0.72 * pasta)
    return pasta + knocks + room + pot() + stand() + nudges()


def suppress(x):
    cells = signal.stft(x, nperseg=512, noverlap=384)[2]
    power = uniform_filter1d(np.abs(cells) ** 2, size=5, axis=2)
    power = uniform_filter1d(power, size=3, axis=1)
    limit = field_ratio(at_hz(SUPPRESS_BELOW, size=512))[:, None] ** 2
    gain = np.maximum((power / (power + limit)) ** 1.3, field_ratio(-11.5))
    return signal.istft(cells * gain, nperseg=512, noverlap=384)[1][:, :N]


def low_pass(x):
    return signal.sosfilt(signal.butter(12, 16150, fs=SR, output="sos"), x)


def record(dry):
    rounded = .95 * np.tanh(suppress(dry) / .95)
    band_limit = signal.cheby2(10, 60, 16700, fs=SR, output="sos")
    return low_pass(signal.sosfilt(band_limit, rounded))


dry = scene()
out = record(dry)
dump_mix(out)
```